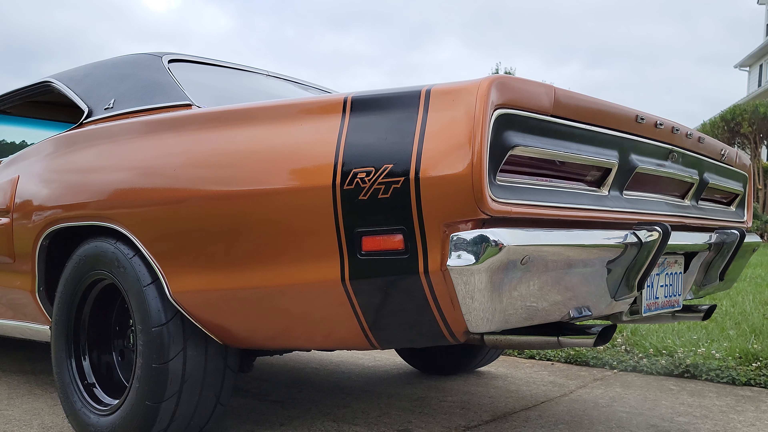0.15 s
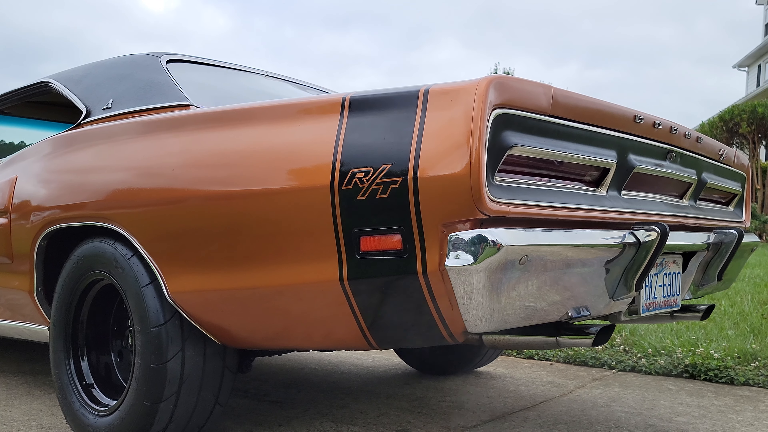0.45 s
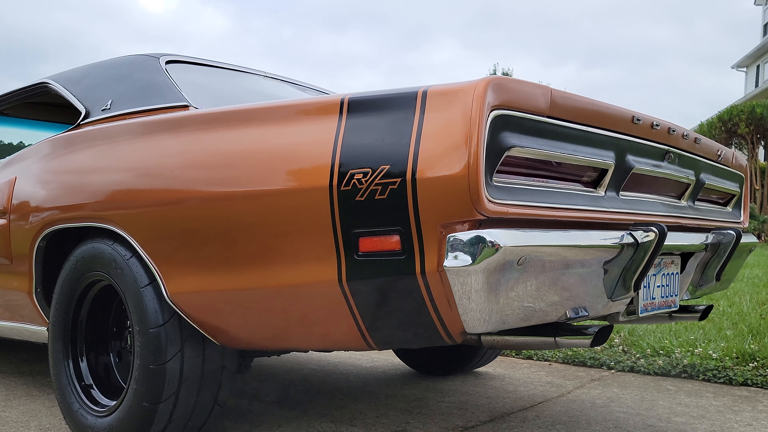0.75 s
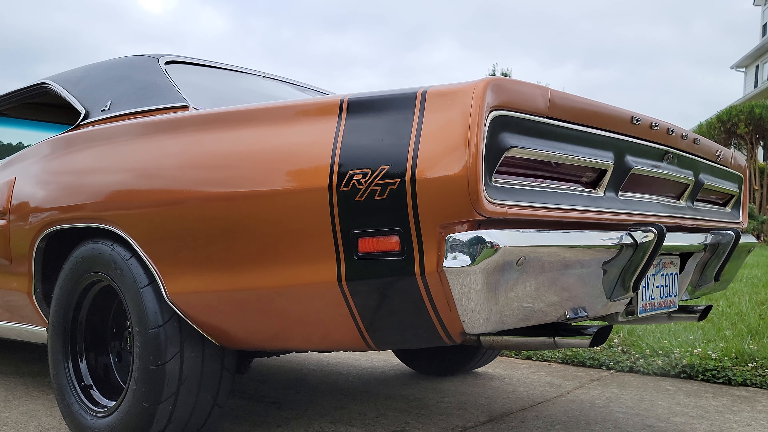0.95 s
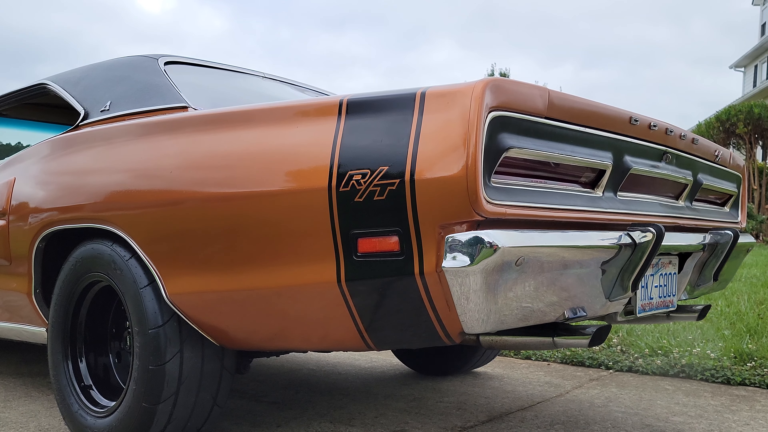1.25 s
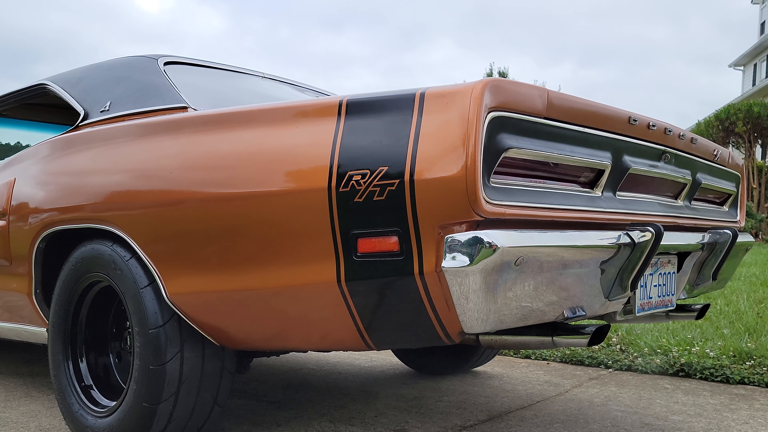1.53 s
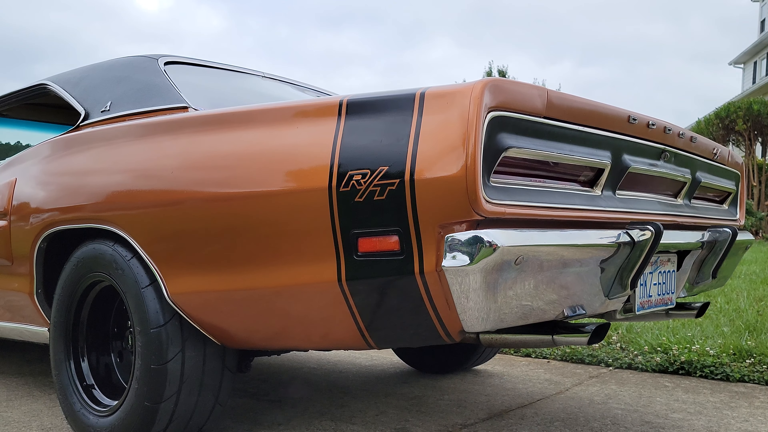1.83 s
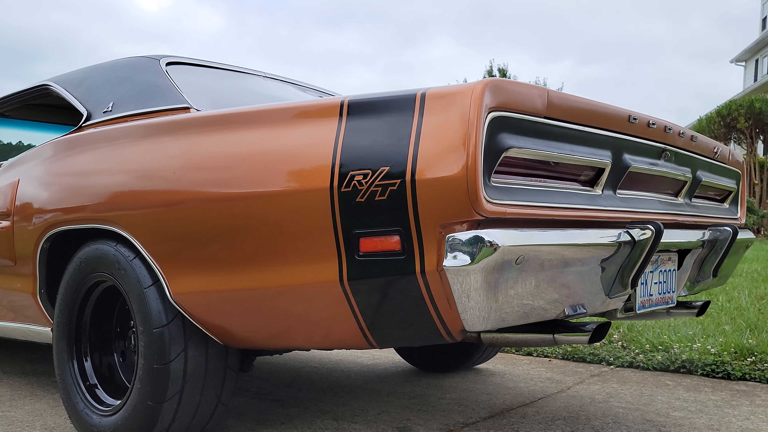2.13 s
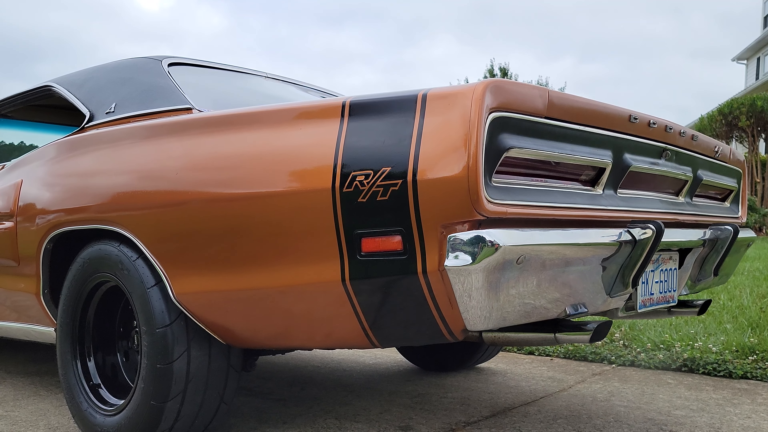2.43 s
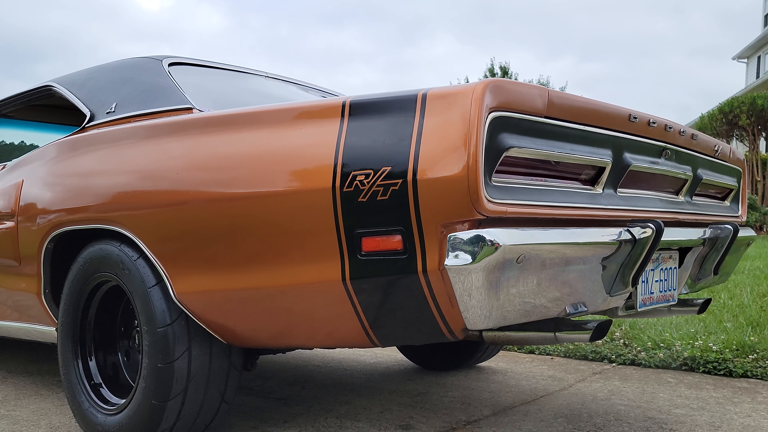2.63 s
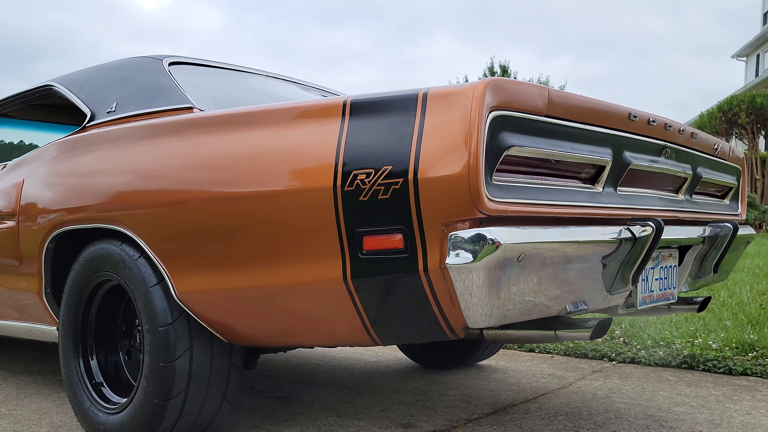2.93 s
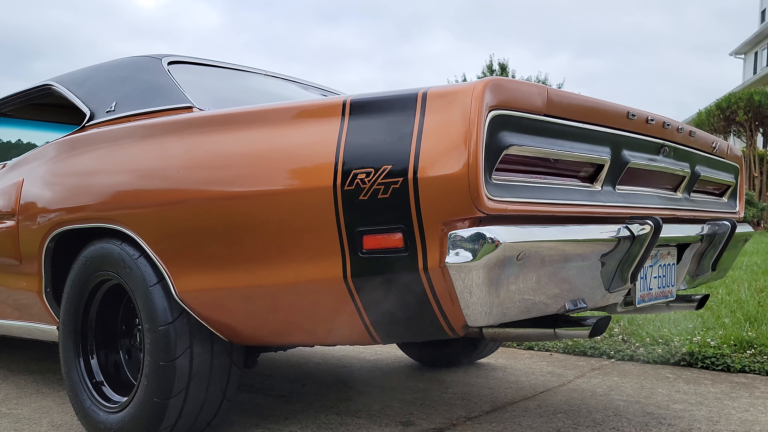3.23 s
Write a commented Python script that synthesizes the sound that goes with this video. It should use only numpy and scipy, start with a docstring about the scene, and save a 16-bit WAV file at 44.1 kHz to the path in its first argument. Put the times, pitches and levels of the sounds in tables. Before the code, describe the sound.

A big V8 car engine is idling from the start, heard beside its twin tailpipes as a deep, loping rumble with burbling, hissing pulses. From about 0.3 seconds, short raspy barks come irregularly. From about 0.7 seconds the engine stumbles briefly now and then, most clearly near 1.9 seconds. A faint belt whine wavers throughout, and the idle holds its speed until the end, around 3.4 seconds.

```python
"""A big V8 idles on a driveway, heard from beside its twin tailpipes.
The sound cuts in with the engine running, its unequal cylinders making it lope. Each firing sends a puff
down the pipe of its cylinder bank: first the pipe booms, then the gas burbles, rasps and hisses at the
tips. The belt drive whines faintly throughout. From about 0.3 s hard firings bark at the tips,
and from about 0.7 s the engine now and then stumbles."""
import sys
import numpy as np
from scipy import signal
from scipy.fft import rfft, irfft
from scipy.io import wavfile

SR = 44100
rng = np.random.default_rng(int(sys.argv[2]) if len(sys.argv) > 2 else 0)


def to_wav(s):
    """Save 16-bit WAV."""
    ch = np.atleast_2d(s).T  # columns
    pcm = np.round(np.clip(ch, -1, 1) * 32767)  # PCM
    wavfile.write(sys.argv[1], SR, pcm.astype(np.int16))


N = 149058
TIME = np.arange(N) / SR


def from_db(db):
    return 10 ** (np.asarray(db) / 20)


def unit_rms(x):
    return x / np.sqrt(np.mean(x ** 2) + 1e-20)


def pan(db):
    """Interaural level difference: two gains for a left-minus-right level."""
    return from_db(np.array([[db], [-db]]) / 2)


def resonance(x, hz, bandwidth):
    """Resonance with steep skirts: two equal second-order stages in cascade, unit gain at the peak."""
    stage = signal.iirpeak(hz, hz / bandwidth, fs=SR)
    return signal.lfilter(*stage, signal.lfilter(*stage, x + 1e-18))


def stereo_noise(correlation):
    """Partial coherence: white noise of which both sides share a part."""
    white = rng.standard_normal((3, N))
    return np.sqrt(correlation) * white[2] + np.sqrt(1 - correlation) * white[:2]


def impulses(times, db):
    """Impulse train: one sample at each time."""
    train = np.zeros(N)
    inside = (times >= 0) & (times < TIME[-1])
    train[(times[inside] * SR).astype(int)] = from_db(db[inside])
    return train


def gaussian(times, centre, sigma_s):
    return np.exp(-.5 * ((times - centre) / sigma_s) ** 2)


# crankshaft speed: (time [s], speed [rpm])
CRANK_SPEED = [(0.0, 799.5), (0.3, 802.5), (0.42, 818.2), (0.55, 798.3), (0.67, 825.1), (0.8, 790.5),
               (1.1, 786.5), (1.35, 795.9), (1.65, 794.2), (1.85, 826.4), (2.0, 795.9), (2.3, 797.9),
               (2.6, 779.2), (2.82, 814.5), (3.05, 802.8), (3.25, 784.1), (3.38, 814.2)]
# cylinders in firing order, levels relative:
# (bank [0 or 1], lateness [firing intervals], puff [dB], burble [dB], rasp [dB], hiss [dB])
FIRING_ORDER = [(0, 0.1995, 0.5, 7.5, 0.5, 10), (0, 0.19, -8.4, 7.5, 5, 7.5), (1, 0.065, 3.87, 4.5, 5, 15),
                (0, 0.2315, 1.7, 0, -1.5, 8), (1, 0.14, 0.5, 6.5, -2, 9.5), (1, 0.11, -1.5, 3.5, -2, 11),
                (0, 0.2795, -0.3, 6.5, 0, 10), (1, .15, 1, 6.5, 3, 12.5)]

def firings(cylinders=8, jitter_s=0.0003):
    """Four-stroke cycle: each cylinder fires once in two turns. Gives each firing's time and row."""
    turns = np.cumsum(np.interp(TIME, *np.transpose(CRANK_SPEED))) / 60 / SR
    count = turns * cylinders / 2
    index = np.arange(int(count[-1]))
    rows = np.array(FIRING_ORDER)[index % cylinders]
    times = np.interp(index + rows[:, 1], count, TIME)
    return times + jitter_s * rng.standard_normal(len(index)), rows


# low pipe modes: (frequency [Hz], stage bandwidth [Hz], gain in pipe 0 [dB], gain in pipe 1 [dB])
PIPE_MODES = [(48.9, 14.3, -16, -17), (68.6, 18.5, -33, -19), (105.55, 14.6, -6, -6),
              (189.3, 19.3, -18.5, -14.5), (276.2, 25, -27, -31), (299.6, 23.8, -27.5, -31),
              (381.7, 24, -39.5, -34), (454.3, 7.7, -33.5, -39.5), (580, 12.4, -42, -46.5)]

def boom(times, bank, db, drive_db=53, spread_db=0.4):
    """Impulse response of an air column: each bank's puffs ring the low modes of its own pipe."""
    db = drive_db + db + spread_db * rng.standard_normal(len(times))
    puffs = [impulses(times[bank == pipe], db[bank == pipe]) for pipe in (0, 1)]
    return pan(-1.5) * sum(resonance(from_db(db0) * puffs[0] + from_db(db1) * puffs[1], hz, bandwidth)
                           for hz, bandwidth, db0, db1 in PIPE_MODES)


GAS_DELAY_S = 0.00717   # the gas leaves the tip after the pressure wave

def gusts(times, db, spread_db, attack_s, decay_s):
    """Pulsating flow: an envelope whose power rises quickly and decays exponentially after each firing."""
    power = impulses(times + GAS_DELAY_S, db + spread_db * rng.standard_normal(len(times))) ** 2
    for tau in (attack_s, decay_s):
        power = signal.lfilter([1], [1, -np.exp(-1 / (tau * SR))], power + 1e-18)
    return unit_rms(np.sqrt(power))


def turbulence(times, db, modes, spread_db, decay_s, correlation, attack_s=0.0013):
    """Random excitation: gusts of noise drive the modes, each with its own strength at each firing."""
    gas, sound = stereo_noise(correlation), 0
    for hz, half_bandwidth, gain_db in modes:
        flow = gusts(times, db, spread_db, attack_s, decay_s)
        sound += from_db(gain_db) * resonance(gas * flow, hz, 2 * half_bandwidth)
    return unit_rms(sound)


# higher pipe modes: (frequency [Hz], stage half-bandwidth [Hz], relative gain [dB])
BURBLE_MODES = [(196.4, 21.8, -2.5), (269.3, 26.4, 4), (376, 28.5, -6.5), (452.2, 20.5, -5.5),
                (478, 14, -14), (566.6, 12.8, -9), (716, 23, -8.5), (823.6, 20, -8), (916.5, 46, -12)]

def burble(times, db):
    """Forced resonance: turbulence stirs the higher modes of the pipes."""
    sound = turbulence(times, db, BURBLE_MODES, spread_db=2.5, decay_s=0.0075, correlation=0.8)
    return from_db(-30) * pan(-7.5) * sound


# modes of the tips: (frequency [Hz], stage half-bandwidth [Hz], relative gain [dB])
TIP_MODES = [(1814, 64, 10), (1965, 59, 5), (2034, 110, 5), (2299, 158, 8), (2604, 124, -2.5),
             (2725, 43, -2.5), (3589, 69, -5), (4370, 220, -26)]

def rasp(times, db):
    """Forced resonance: the escaping gas excites the bright modes of the tips."""
    sound = turbulence(times, db, TIP_MODES, spread_db=2.7, decay_s=0.0087, correlation=0.71)
    return from_db(-28.5) * pan(-9.5) * sound


# relative spectrum of the rushing gas: (frequency [Hz], left level [dB], right level [dB])
JET_SPECTRUM = [(300, 14, -3), (920, 9, 17.5), (1530, 0, 15), (2900, 5.5, -6), (3250, -3, -8),
                (3730, 10.5, -7), (4230, 3, 10), (4900, 4, 1), (6000, 1, -21), (6560, -6, -28),
                (9450, -0.5, -5), (12700, -10.5, -4), (14000, -14, -18.5), (16000, -11, -9.5)]
# edges of the bands that swell separately: (frequency [Hz])
JET_BAND_EDGES = [3300, 3900, 4600, 5500, 6500, 8000, 9300, 10500, 11700, 13000]

def hiss(times, db, scatter_s=0.0019):
    """Broadband flow noise: each band swells at its own moment, so the colour changes with each firing."""
    hz, *sides = np.transpose(JET_SPECTRUM)
    bins_hz = np.arange(N // 2 + 1) * SR / N
    shape_db = [np.interp(np.log(bins_hz + 1), np.log(hz), side) for side in sides]
    spectrum = rfft(stereo_noise(correlation=0.21)) * from_db(shape_db)
    band_of_bin, sound = np.searchsorted(JET_BAND_EDGES, bins_hz), 0
    for band in np.unique(band_of_bin):
        onsets = times + scatter_s * rng.standard_normal(len(times))
        flow = gusts(onsets, db, spread_db=3, attack_s=0.0052, decay_s=0.0083)
        sound += flow * irfft(spectrum * (band_of_bin == band), N)
    return from_db(-38) * unit_rms(sound)


# tones of the belt drive: (frequency [Hz], stage bandwidth [Hz], base level [dB])
BELT_TONES = [(1137, 14, -50.5), (1354, 18, -44.5), (1372, 6.3, -46)]
# swell of those tones: (time [s], gain [dB])
BELT_SWELL = [(0, 2.5), (1.2, -2.5), (2.4, -2.5), (2.75, 2), (3.1, -2.5), (3.33, 7)]

def belt_whine():
    """Narrowband noise: sharp resonances give the belt drive thin, wavering tones."""
    tones = sum(from_db(db) * unit_rms(resonance(rng.standard_normal(N), hz, bandwidth))
                for hz, bandwidth, db in BELT_TONES)
    return from_db(np.interp(TIME, *np.transpose(BELT_SWELL))) * pan(-3) * tones


# gusts of hard firings at the tips: (time [s], relative rasp level [dB])
HARD_FIRINGS = [(.329, 6), (0.64, 8), (0.736, -2), (0.771, 7), (.851, 5), (1.08, 2), (1.232, 7), (1.379, 9),
                (1.53, 0), (1.83, 7.5), (1.939, 1), (2.076, 8.5), (2.136, -12), (2.432, -17), (2.584, 7),
                (2.882, -3), (2.972, 5.5), (3.184, -23)]

def add_barks(times, db):
    """Transient excitation: hard firings add extra gusts to those that drive the rasp."""
    bark_times, bark_db = np.transpose(HARD_FIRINGS)
    return np.r_[times, bark_times - GAS_DELAY_S], np.r_[db, bark_db]


# stumbles of the engine: (time [s], peak loss [dB])
ENGINE_STUMBLES = [(0.721, 3), (1.022, 3), (1.62, 5), (1.923, 8), (2.224, 3.5), (2.83, 4), (3.125, 4.5)]

def stumble_loss(times, sigma_s=0.014):
    """Amplitude modulation: each stumble is a brief, bell-shaped loss in dB."""
    return sum(db * gaussian(times, at, sigma_s) for at, db in ENGINE_STUMBLES)


def hiss_loss(times, depth_db=8, sigma_s=0.018):
    """Starved flow: a loss in dB that sinks the hiss just ahead of each stumble."""
    return depth_db * sum(gaussian(times, at - sigma_s / 2, sigma_s) for at, _ in ENGINE_STUMBLES)


def scene(sag_share=0.96, sag_delay_s=0.017, left_lag_s=0.00018):
    """Superposition: four exhaust layers follow the same firings, and the whine joins them."""
    times, rows = firings()
    bank, _, puff_db, burble_db, rasp_db, hiss_db = rows.T
    loss_db = stumble_loss(times)
    sag_db = sag_share * stumble_loss(TIME - sag_delay_s)   # the boom sags a little after a stumble
    mix = burble(times, burble_db - loss_db / 2)
    mix += rasp(*add_barks(times, rasp_db - loss_db))
    mix += from_db(-sag_db) * boom(times, bank, puff_db - loss_db / 2)
    mix += hiss(times, hiss_db - hiss_loss(times))
    left, right = mix + belt_whine()
    # the pipes are to the right, so the left side hears them later
    return np.array([np.roll(left, int(left_lag_s * SR)), right])


def record(dry, start_s=0.069, cutoff_hz=15800):
    """Gating and band limiting: the sound cuts in, and a steep low-pass removes the highest treble."""
    lowpass = signal.ellip(10, .1, 80, cutoff_hz, fs=SR, output="sos")
    return signal.sosfilt(lowpass, dry * (TIME >= start_s))


dry = scene()
out = record(dry)
to_wav(out)
```